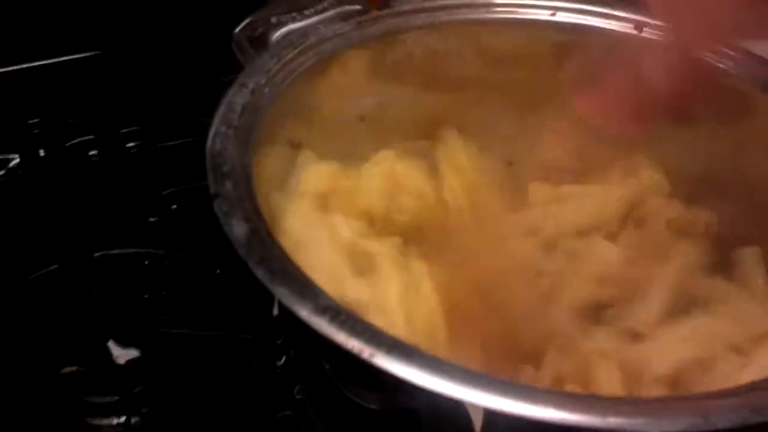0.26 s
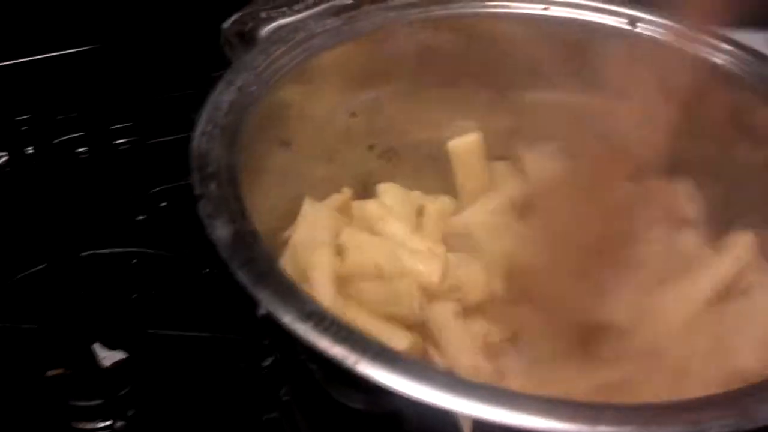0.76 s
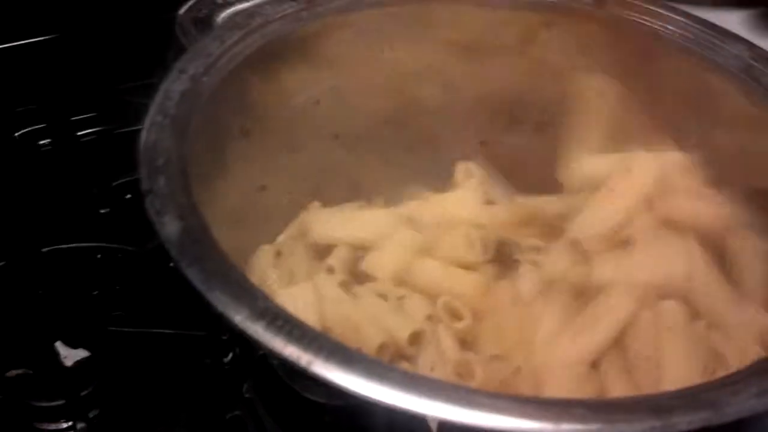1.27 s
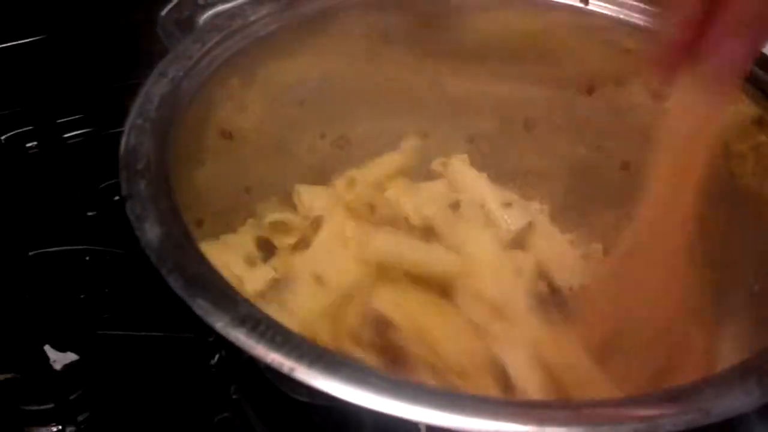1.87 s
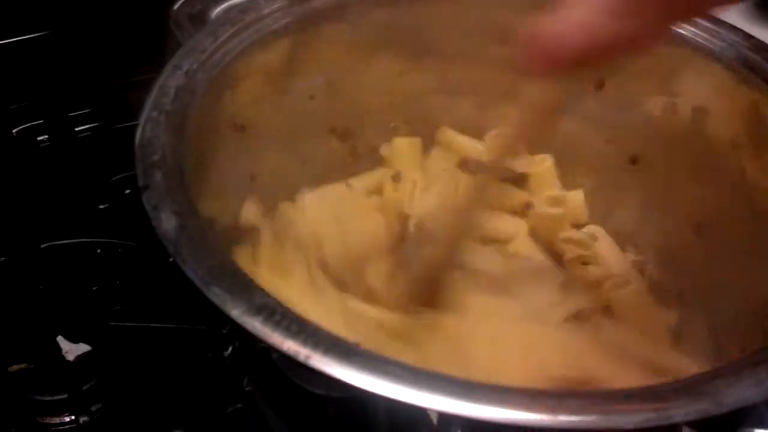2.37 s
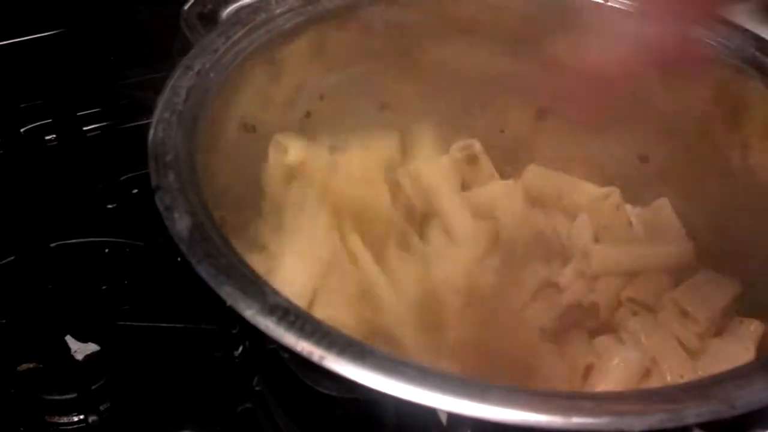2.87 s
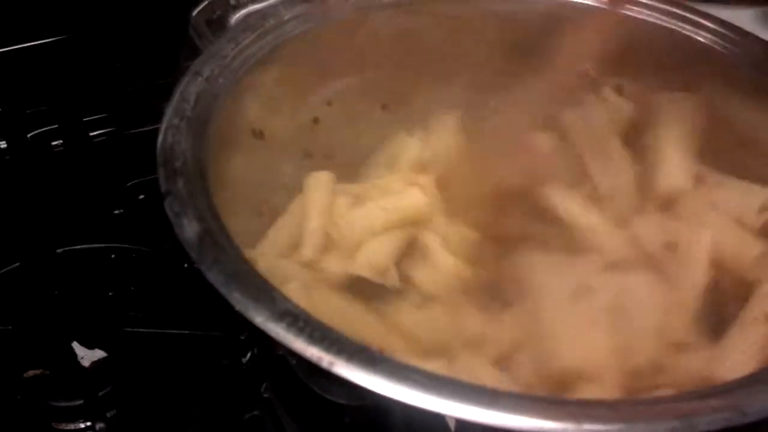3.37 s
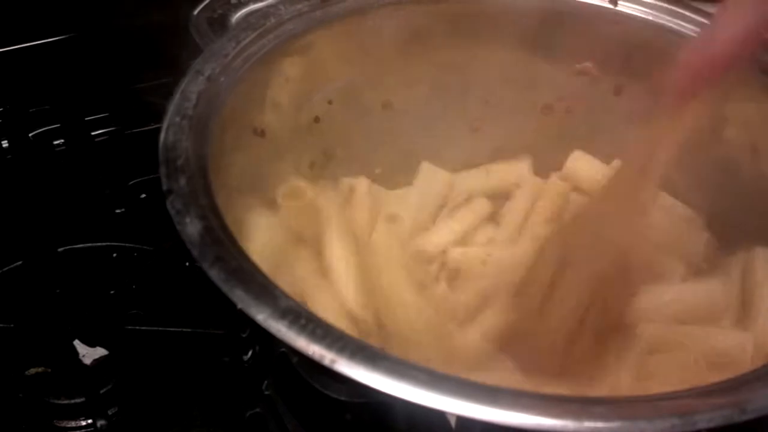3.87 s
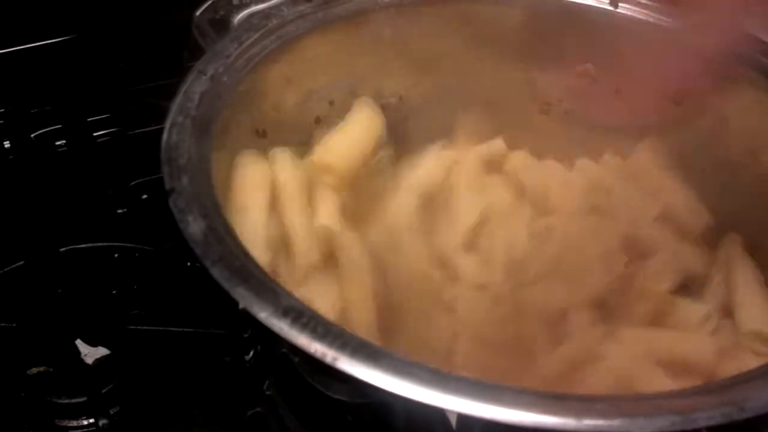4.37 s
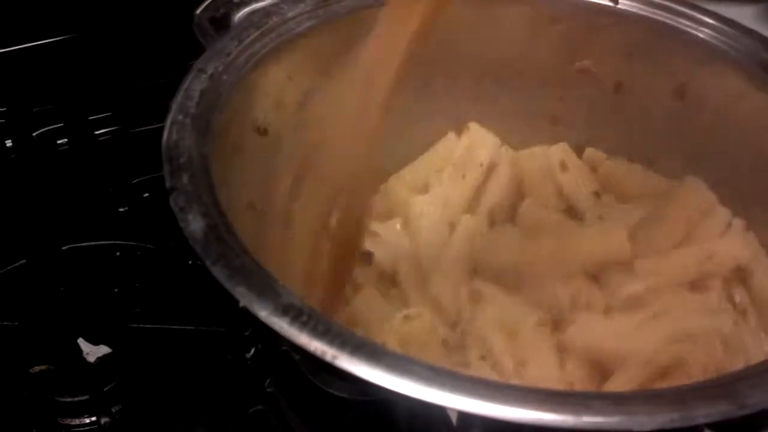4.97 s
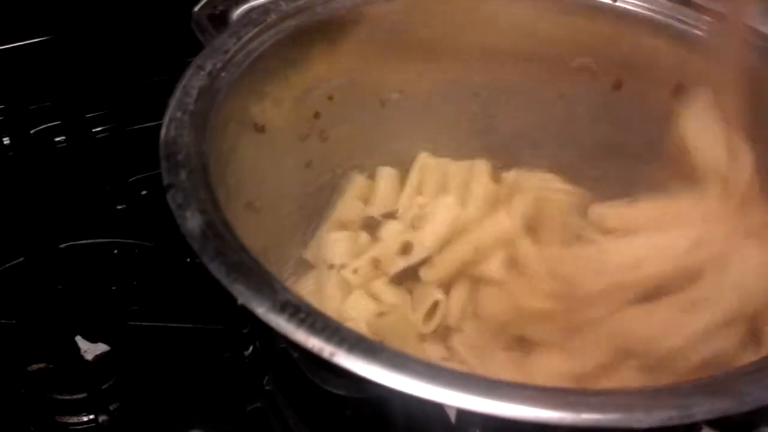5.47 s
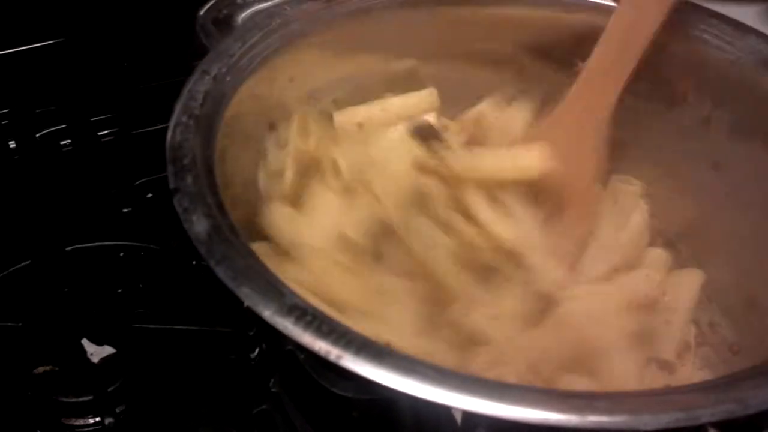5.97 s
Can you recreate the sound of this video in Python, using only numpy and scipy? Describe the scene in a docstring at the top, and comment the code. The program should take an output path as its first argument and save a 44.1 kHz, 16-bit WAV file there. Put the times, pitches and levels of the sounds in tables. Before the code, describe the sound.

Close up in a quiet kitchen, a wooden spoon stirs egg-coated pasta in a steel pot. A vigorous wet burst of squelching, popping and base knocks eases into softer sliding, with a hard ringing clack on the wall. Stirring grows again with sticky crackles, flopping lumps and short groans from the pot, calms around another clack, then continues gently. Wide stereo, with short hollow pot echoes.

```python
"""Stirring pasta in a steel pot

A wooden spoon stirs pasta quickly through raw egg in a steel pot on a kitchen hob. Shaped noise and
grains slosh and fizz, swelling sines squelch and pop, and wet noise bursts flop down; the spoon rings
the base's damped modes and twice clacks the wall, and the base groans. Two close microphones are
cross-fed into wide stereo."""
import sys
import numpy as np
from scipy import signal
from scipy.fft import rfft, irfft, next_fast_len
from scipy.io import wavfile
from scipy.ndimage import uniform_filter1d

SR = 44100
rng = np.random.default_rng(int(sys.argv[2]) if len(sys.argv) > 2 else 0)


def store_wav(level_fs):
    """Save 16-bit WAV to argv[1]."""
    pcm = np.round(np.clip(np.atleast_2d(level_fs), -1, 1) * 32767)
    wavfile.write(sys.argv[1], SR, pcm.T.astype(np.int16))


N = 274302
T = np.arange(N) / SR


def amp(db):
    """Decibels to gain."""
    return 10 ** (np.asarray(db) / 20)


def evened(x):
    """Scales to an rms of 1."""
    return x / np.sqrt(np.mean(x ** 2) + 1e-20)


def peaked(x, size=88):
    """Scales so that the loudest two milliseconds have an rms of 1."""
    return x / np.sqrt(uniform_filter1d(x ** 2, size).max() + 1e-20)


def read(points, hz):
    """Reads a table on a log-frequency axis."""
    f, value = np.transpose(points)
    return np.interp(np.log(hz + 1), np.log(f + 1), value)


def add(mix, s, sound):
    """Adds a sound to the mix at a time."""
    part = mix[max(round(s * SR), 0):][:len(sound)]
    part += sound[:len(part)]


def through(x, response):
    """Convolution, cut to the input's length."""
    return signal.oaconvolve(x, response)[:len(x)]


def colour(points, size=4096):
    """Causal (minimum-phase) impulse response with a given spectrum."""
    log_gain = np.log(amp(read(points, abs(np.fft.fftfreq(size, 1 / SR)))))
    return np.fft.ifft(np.exp(np.conj(signal.hilbert(log_gain)))).real[:size // 2]


def high_pass(x, hz):
    """Second-order low cut."""
    return signal.sosfilt(signal.butter(2, hz, "high", fs=SR, output="sos"), x)


def band(x, hz, spread):
    """Broad resonance between hz / spread and hz * spread."""
    edges = [hz / spread, hz * spread]
    return signal.sosfilt(signal.butter(2, edges, "band", fs=SR, output="sos"), x)


def swell(t, rise_s):
    """Rises to 1 in the rise time and dies away."""
    u = t / rise_s
    return u * np.exp(1 - u)


def fall(t, t60_s):
    """Exponential decay by 60 dB in t60."""
    return np.exp(-np.log(1000) * t / t60_s)


def ring(modes, detune=1, length=1):
    """Dying sines of a struck object."""
    t = T[:SR // 2]
    return sum(amp(db) * fall(t, t60 * length) * np.sin(2 * np.pi * hz * detune * t)
               for hz, db, t60 in modes)


def bubble(t, hz, rise_s, glide=0.017):
    """A pocket of air rings while it opens, rising in pitch; silent before t = 0."""
    t = np.maximum(t, 0)
    bend = 1 + glide * np.clip(t / rise_s - 1, -1, 5)
    return swell(t, rise_s) * np.sin(2 * np.pi * hz * np.cumsum(bend) / SR)


def grains(per_s, spread_db, low_hz, high_hz, cycles, count=16):
    """Many tiny bursting films, each a short rising chirp; a few are much larger than the rest."""
    out = np.zeros(N)
    for hz in np.geomspace(low_hz, high_hz, count):
        place, size, chance = rng.random((1000, 3)).T
        hit = chance < per_s * N / SR / count / len(chance)
        size = np.minimum(-np.log(1 - size), 4.5)
        clicks = np.bincount((place * N).astype(int), hit * amp(spread_db * size), N)
        u = T[:int(SR * 4 * cycles / hz) + 8] * hz  # time in cycles
        chirp = swell(u, cycles / 2) * np.sin(2 * np.pi * u * (1 + 0.014 * u / cycles))
        out += np.sqrt(hz) * evened(through(clicks, chirp))
    return evened(out)


def clumps(per_s, depth_db):
    """A gain that lurches at random as lumps stick and let go."""
    steps = rng.standard_normal(2000)
    return amp(depth_db * np.interp(T * per_s, np.arange(len(steps)), steps))


# air inside the pot: freq_hz, level_db, t60_s
AIR_MODES = [(442, 0, 0.07), (790, -26, 0.18), (941, 3.5, 0.051), (1240, 3, 0.034), (1350, -20, 0.0089),
             (1596, 7, 0.031)]


def hollow(x, ring_db=-5):
    """The pot's air column rings along with whatever sounds inside it."""
    # each mode's level becomes its gain at resonance
    modes = [(hz, db + 20 * np.log10(2 * np.log(1000) / (t60 * SR)), t60) for hz, db, t60 in AIR_MODES]
    in_phase = -signal.hilbert(ring(modes)).imag  # sines to cosines
    return x + amp(ring_db) * through(x, in_phase)


# stirring effort, three bouts with gentle turning between: time_s, effort_db
EFFORT_CURVE = [(0.0, -3), (0.52, 1), (0.76, -15.5), (1.12, -19), (1.5, -15), (1.7, -20.5), (1.83, -12.5),
                (2.0, -10), (2.25, -14.5), (2.68, -2.5), (2.87, -7.5), (3.03, -7), (3.1, -18.5), (3.6, -8),
                (3.95, -7.5), (4.56, -2.5), (4.75, -7), (5.06, -19.5), (5.88, -18.5), (6.22, -11)]


def effort(s):
    """The stirring effort in dB at the given times."""
    return np.interp(s, *np.transpose(EFFORT_CURVE))


def chance_events(per_s, scatter_db, count=200):
    """Small events strewn in time, louder with the effort: rows of (s, level dB, a free draw 0-1)."""
    wait, free, size = rng.random((count, 3)).T
    s = np.cumsum(-np.log(1 - wait)) / per_s
    db = effort(s) + scatter_db * (2 * size - 1)
    return np.transpose([s, db, free])[s < N / SR]


def hum(hz=120, level_db=-69.5):
    """Mains hum of a kitchen appliance: one steady sine."""
    return amp(level_db) * np.sin(2 * np.pi * hz * T)


# kitchen noise spectrum: freq_hz, level_db
KITCHEN_COLOUR = [(20, -2), (60, -26), (85, -15), (125, -4), (200, 0.5), (450, -5), (1000, -37),
                  (2500, -36), (6000, -62), (16000, -28)]


def kitchen(level_db=-62.5):
    """Steady background of the kitchen: coloured noise."""
    return amp(level_db) * evened(through(rng.standard_normal(N), colour(KITCHEN_COLOUR)))


# base slips on the hob: start_s, length_s, level_db, start_pitch_hz, end_pitch_hz
BASE_SLIPS = [(2.21, 0.1, -38.5, 343, 310), (2.288, 0.11, -42, 313, 380), (2.36, 0.15, -48.5, 378, 418),
              (2.387, 0.14, -43.5, 323.8, 331), (2.578, 0.15, -39, 307, 330),
              (2.714, 0.094, -37, 336.5, 241), (2.93, 0.092, -47, 257, 216), (2.967, 0.058, -40, 340, 335),
              (3.225, 0.069, -45, 340, 321), (3.642, 0.066, -41, 337, 308), (4.32, 0.079, -38, 263, 315),
              (4.855, 0.075, -45, 320, 293)]


def drag(level_db=-3, flutter=0.29, wobble=0.019, rumble_db=-15, rumble_hz=115):
    """The pot groans over a low rumble as it shifts on the hob; each slip swells, glides and dies."""
    out = np.zeros(N)
    pressure, speed, rumble = rng.standard_normal((3, N))
    pressure, speed = evened(band(pressure, 25, 2)), evened(band(speed, 18, 2))
    rumble = amp(rumble_db) * evened(band(rumble, rumble_hz, 1.13))
    for s, length_s, db, start_hz, end_hz in BASE_SLIPS:
        t = T[:int(length_s * SR)]
        now = int(s * SR) + np.arange(len(t))
        hz = (start_hz + (end_hz - start_hz) * t / length_s) * (1 + wobble * speed[now])
        groan = (1 + flutter * pressure[now]) * np.sin(2 * np.pi * np.cumsum(hz) / SR)
        add(out, s, amp(db + level_db) * np.sin(np.pi * t / length_s) * (groan + rumble[now]))
    return out


# pasta drops back and jolts the pot: start_s, slap_level_db, rocking_level_db
FLOP_EVENTS = [(0.214, -39, -34), (0.537, -49, -36), (1.34, -52, -48.5), (1.5, -59, -68),
               (2.096, -41, -41.5), (2.744, -34, -34), (3.156, -64, -50), (3.447, -41.5, -40),
               (3.731, -38.5, -36), (4.028, -38.5, -34), (4.305, -31, -29), (4.587, -29.5, -30),
               (4.727, -38, -62), (5.495, -50.5, -45.5), (5.589, -49.5, -62)]
# whole pot rocking and ringing on the hob: freq_hz, level_db, t60_s
ROCK_MODES = [(170.3, 0, 0.17), (274, -8.5, 0.19), (321.5, -10.5, 0.17), (393, -10.5, 0.22),
              (909, -1, 0.12), (962, 2, 0.14), (1034, -14.5, 0.43), (1200, -17, 0.24), (1407, -7, 0.16)]
# wet body, shared with the sloshing: freq_hz, level_db
SLOSH_COLOUR = [(30, 0), (60, -7), (90, 3), (160, 8.5), (330, 9.5), (480, 1.5), (620, -3.5), (880, 1),
                (1500, -3.5), (2100, -15.5), (3000, -30), (5000, -29)]


def flops(slap_db=0.5, slap_rise_s=0.00054, slap_s=0.028, rock_rise_s=0.0099, spray_db=-11, spray_s=0.0047):
    """Lifted pasta lands in wet spray and a patter of soft blows; the pot rocks and rings under it."""
    out, t = np.zeros(N), T[:SR // 2]
    body = colour(SLOSH_COLOUR)
    for s, db, rock_db in FLOP_EVENTS:
        blows, spray = rng.standard_normal((2, len(t)))
        patter = blows * (1 - np.exp(-t / slap_rise_s)) * np.exp(-t / slap_s)
        slap = peaked(hollow(through(patter, body), ring_db=4.5))
        spray = peaked(band(spray * np.exp(-t / spray_s), 3300, 1.4))
        rock = ring(ROCK_MODES, rng.uniform(0.99, 1.007)) * (1 - np.exp(-(t / rock_rise_s) ** 2))
        add(out, s, amp(db + slap_db) * slap)
        add(out, s, amp(db + spray_db) * spray)
        add(out, s, amp(rock_db) * peaked(rock))
    return out


# spoon on the base: start_s, level_db, then relative to it upper_ring_db, splash_db, thump_db;
# ring_length_factor
KNOCK_EVENTS = [(0.1265, -16, -29, -21, -17, 0.62), (0.1335, -15.5, -23, -14, -22, 0.82),
                (0.4594, -11.5, 3, -13, -14, 0.96), (2.644, -13, -4, -13.5, -9.5, 0.7),
                (3.940, -16, -32, -21, -25, 0.55), (3.945, -22.5, -23, -11.5, -17, 1.1),
                (4.529, -19.5, -19, -14, -11, 0.85), (5.3196, -32, -14, -19, -13, 0.41)]
# loaded base, lower and upper ring: freq_hz, level_db, t60_s
BASE_MODES = [(446, 20, 0.032), (463, -2, 0.12), (755.5, 8, 0.12)]
BASE_UPPER_MODES = [(970, 7, 0.025), (1280, 9.5, 0.0058), (1560, 5.5, 0.049)]


def knocks(upper_db=-2.5, contact_s=0.00083, splash_s=0.014, hob_db=-10, thump_hz=175, thump_rise_s=0.011):
    """Spoon hits the base through pasta: a soft blow, a damped ring and a splash; the hob thumps below."""
    out, hob, t = np.zeros(N), np.zeros(N), T[:SR // 2]
    soft = 1 - np.exp(-t / contact_s)
    for s, db, bright_db, splash_db, thump_db, length in KNOCK_EVENTS:
        detune = rng.uniform(0.98, 1.015)
        spatter, shudder = rng.standard_normal((2, len(t)))
        upper = amp(bright_db + upper_db) * peaked(ring(BASE_UPPER_MODES, detune, length))
        body = peaked(ring(BASE_MODES, detune, length)) + upper
        splash = amp(splash_db) * peaked(band(spatter * np.exp(-t / splash_s), 1016, 1.45))
        thump = peaked(band(shudder * swell(t, thump_rise_s), thump_hz, 1.55))
        add(out, s, -amp(db) * soft * (body + splash))
        add(hob, s, amp(db + thump_db + hob_db) * thump)
    return high_pass(out, 260) + hob  # a small plate radiates little bass


# spoon on the bare wall: start_s, level_db
CLACK_EVENTS = [(0.903, -11.5), (4.9434, -13)]


def rubs(length_s=0.22, level_db=-50, pitch_hz=352, slips_per_s=260):
    """The spoon's edge sticks and slips along the wall on its way to each clack."""
    out, t = np.zeros(N), T[:int(length_s * SR)]
    pressure = np.sqrt(np.sin(np.pi * t / length_s))
    for s, _ in CLACK_EVENTS:
        slips = rng.standard_normal(len(t)) * (rng.random(len(t)) < slips_per_s / SR)
        add(out, s - length_s, amp(level_db) * pressure * evened(band(slips, pitch_hz, 1.6)))
    return out


# steel wall, also woken by snaps: freq_hz, level_db, t60_s
WALL_MODES = [(471, 2, 0.49), (656, 2.5, 0.29), (822, -8, 0.22), (881, 7, 0.2), (1448, -10, 0.49),
              (1600, 1.5, 0.25), (1780, -10, 0.3), (2130, -15, 0.44), (2297, 5, 0.27), (2296, 0, 0.46),
              (2403, 4, 0.35), (3470, -5, 0.4), (3450, 3, 0.45), (3780, -17, 0.12), (3980, -32, 0.24),
              (4200, -11, 0.57), (4130, -6, 0.34), (4097, -27, 0.2), (4300, -17, 0.32), (4660, -7, 0.24),
              (4750, -1, 0.3), (6300, 1, 0.13), (6620, 13, 0.061)]
# crack of wood on steel: freq_hz, level_db
CRACK_COLOUR = [(60, -19), (200, -7.5), (340, 5.5), (800, 3), (1250, -0.5), (2400, 6), (4200, 8.5),
                (6500, -1), (8500, -8.5), (10500, -0.5), (16000, -15)]


def clacks(level_db=1.0, rattle=0.12, rattle_s=0.0054, bounce=0.3, bounce_s=0.0035,
           wall_db=-22, shimmer_db=-25.0, shimmer_t60_s=0.28):
    """Wood on bare steel: a hard crack, one quick bounce, a rattle of short modes, then long ones."""
    out, t = np.zeros(N), T[:SR // 3]
    for s, db in CLACK_EVENTS:
        short, long = rng.standard_normal((2, len(t)))
        blow = rattle * band(short, 540, 2.34) * np.exp(-t / rattle_s)
        blow[0] += 1
        add(blow, bounce_s, np.array([bounce]))
        # modes too close to tell apart
        crowd = 0.85 * evened(band(long, 2200, 1.086)) + 0.15 * evened(band(long, 3670, 1.25))
        crowd += evened(band(long, 3000, 1.9))
        add(out, s, amp(db + level_db) * peaked(through(blow, colour(CRACK_COLOUR))))
        add(out, s, amp(db + wall_db) * peaked(ring(WALL_MODES)))
        add(out, s, amp(db + shimmer_db) * peaked(crowd * fall(t, shimmer_t60_s)))
    return out


# thick threads of egg snapping: start_s, pop_level_db, pop_pitch_hz, tick_level_db
THICK_THREADS = [(0.037, -34, 3650, -42), (0.058, -29.5, 3850, -39), (0.0935, -24.5, 3330, -43),
                 (0.1146, -29.5, 4600, -41), (0.1268, -26, 3740, -39), (0.21, -40, 3720, -58),
                 (0.373, -30, 3600, -58), (0.4227, -35, 3520, -40), (0.434, -28.5, 3520, -48),
                 (0.577, -42, 4170, -63), (0.653, -42, 3970, -48), (0.7068, -45, 3500, -48),
                 (0.769, -62, 4000, -55), (1.222, -38.5, 3770, -56), (1.274, -43, 4300, -52),
                 (1.637, -57, 3900, -53.5), (1.77, -42.5, 3670, -55), (1.857, -41, 3830, -61),
                 (1.903, -35.5, 3960, -61), (2.035, -38, 3440, -69), (2.162, -42, 3890, -66),
                 (2.182, -35, 3400, -62), (2.191, -47, 3500, -49), (2.2105, -35.5, 4600, -43),
                 (2.362, -62, 4000, -47), (2.451, -39, 3840, -50), (2.504, -39, 3770, -65),
                 (2.5258, -24.5, 4860, -56), (2.528, -28, 3200, -44), (2.535, -31, 4200, -51),
                 (2.542, -36, 4330, -56), (2.72, -23, 4400, -45), (2.76, -48, 4000, -47),
                 (2.833, -33.5, 4800, -49), (2.958, -23.5, 3460, -46), (3.012, -32, 3680, -50),
                 (3.017, -22, 3500, -34.5), (3.022, -24.5, 3820, -32), (3.189, -44, 4500, -68),
                 (3.3343, -43, 3600, -43), (3.385, -37.5, 3930, -50), (3.587, -29, 3680, -41.5),
                 (3.642, -32, 3300, -57), (3.671, -42, 3800, -50), (3.730, -32, 3380, -52),
                 (3.843, -36, 3730, -64), (3.891, -35.5, 4570, -61), (3.930, -33, 3860, -50),
                 (3.98, -46, 3900, -43.5), (4.118, -36, 4450, -58), (4.182, -35, 3710, -56),
                 (4.246, -33, 3970, -38.5), (4.274, -34.5, 3400, -38), (4.365, -34, 4460, -37),
                 (4.469, -36, 3870, -52), (4.486, -39, 3520, -42), (4.496, -34, 4530, -53),
                 (4.5188, -33, 3780, -40), (4.529, -26.5, 3680, -41), (4.582, -35.5, 3800, -47),
                 (4.634, -52, 4000, -50), (4.728, -35.5, 4080, -47), (4.782, -43, 4300, -47),
                 (4.885, -69, 3970, -55), (5.3257, -35.5, 3140, -48.5), (5.346, -46, 4100, -60),
                 (5.452, -46, 3830, -71), (5.62, -46.5, 4770, -53.5), (5.9876, -45, 3930, -42),
                 (6.191, -41, 3900, -55)]
# thin threads snap at random; levels at 0 dB effort
THREADS_PER_S, THREAD_POP_DB, THREAD_TICK_DB, THREAD_SCATTER_DB = 7, -34.5, -51, 5.5
THREAD_LOW_HZ, THREAD_HIGH_HZ = 3230, 4970


def snaps(rise_s=0.00037, spread=1.32, pop_db=-2, tick_db=7.5, tick_rise_s=0.0001, wall_db=-25):
    """Sticky threads break: a tiny bubble pops, with a bright tick that faintly wakes the steel."""
    out, t = np.zeros(N), T[:SR // 50]
    wall = peaked(ring(WALL_MODES))
    thin = [(s, THREAD_POP_DB + db, THREAD_LOW_HZ + free * (THREAD_HIGH_HZ - THREAD_LOW_HZ),
             THREAD_TICK_DB + db)
            for s, db, free in chance_events(THREADS_PER_S, THREAD_SCATTER_DB)]
    for s, db, hz, crisp_db in THICK_THREADS + thin:
        splutter, tick = rng.standard_normal((2, len(t)))
        pop = np.sin(2 * np.pi * hz * t) + 0.72 * evened(band(splutter, hz, spread))
        add(out, s, amp(db + pop_db) * peaked(pop * swell(t, rise_s)))
        add(out, s, amp(crisp_db + tick_db) * peaked(band(tick * swell(t, tick_rise_s), 10200, 1.41)))
        add(out, s, amp(db + wall_db) * wall)
    return out


# large air pockets squeezed out of the pasta: start_s, level_db, pitch_hz, swell_s
LARGE_POCKETS = [(0.067, -26, 860, 0.0046), (0.187, -18, 1080, 0.0012), (0.209, -21.5, 990, 0.0009),
                 (0.317, -24.5, 950, 0.0018), (0.374, -29.5, 1320, 0.0037), (0.539, -22.5, 880, 0.0028),
                 (0.581, -25.5, 1039, 0.0037), (0.61, -24, 1060, 0.00087), (0.643, -25, 845, 0.0032),
                 (1.057, -38.5, 1560, 0.0046), (1.128, -38, 1650, 0.00078), (1.342, -43, 1000, 0.0068),
                 (1.392, -44, 987, 0.0045), (1.43, -37, 1830, 0.00064), (1.501, -39, 984, 0.0078),
                 (1.581, -46.5, 1286, 0.0091), (1.901, -25.5, 918, 0.0058), (1.974, -36, 1550, 0.00084),
                 (2.001, -27.5, 930, 0.0017), (2.033, -33.5, 1410, 0.0024), (2.055, -25, 916, 0.0046),
                 (2.337, -32.5, 1020, 0.0022), (2.393, -31.5, 1230, 0.0017), (2.42, -35, 1052, 0.0048),
                 (2.468, -32.5, 1370, 0.002), (2.534, -28.5, 1580, 0.0025), (2.564, -28.5, 1360, 0.0011),
                 (2.658, -25.5, 1394, 0.007), (2.7, -14, 935, 0.0022), (2.707, -13.5, 1468, 0.0023),
                 (2.716, -16.5, 1104, 0.0026), (2.837, -29.5, 936, 0.0026), (2.912, -27.5, 855, 0.0019),
                 (2.98, -29.5, 1320, 0.002), (3.012, -26, 1176, 0.0015), (3.151, -39.5, 930, 0.0016),
                 (3.288, -34, 1010, 0.0011), (3.327, -37.5, 1016, 0.0034), (3.361, -36.5, 1100, 0.0048),
                 (3.535, -37, 1386, 0.0045), (3.582, -29, 995, 0.0038), (3.594, -25, 920, 0.0016),
                 (3.596, -26.5, 1720, 0.0015), (3.703, -30.5, 1150, 0.0013), (3.884, -35.5, 876, 0.003),
                 (4.123, -35, 1525, 0.002), (4.171, -26, 900, 0.0014), (4.218, -35, 1100, 0.0038),
                 (4.248, -17.5, 1140, 0.00065), (4.292, -23.5, 1350, 0.0016), (4.311, -25, 968, 0.0043),
                 (4.451, -26, 890, 0.0033), (4.524, -18, 1110, 0.0019), (4.59, -23.5, 940, 0.0018),
                 (4.699, -31.5, 940, 0.0032), (4.723, -29.5, 860, 0.0021), (4.738, -30.5, 1300, 0.0026),
                 (4.742, -26, 939, 0.0042), (5.11, -43, 1170, 0.0021), (5.227, -46, 1350, 0.0023),
                 (5.284, -44, 940, 0.0056), (5.3255, -31.5, 1150, 0.00065), (5.419, -41, 1120, 0.0025),
                 (5.433, -42.5, 834, 0.0057), (5.496, -39, 950, 0.0034), (5.575, -36, 893, 0.007),
                 (5.596, -32.5, 895, 0.0072), (5.602, -28.5, 1030, 0.0043), (5.781, -43, 983, 0.0042),
                 (6.072, -33, 934, 0.0045)]
# small pockets come at random; level at 0 dB effort
POCKETS_PER_S, POCKET_DB, POCKET_SCATTER_DB, POCKET_SWELL_S = 9, -33.5, 1, 0.0034
POCKET_LOW_HZ, POCKET_HIGH_HZ = 855, 1746


def squelches(froth=0.67, spread=1.45, clean_s=0.012, splutter=0.69, spray_db=-20, level_db=-6, count=5):
    """An air pocket opens among smaller ones; slow ones ring round and clean, quick ones splutter."""
    out, t = np.zeros(N), T[:SR // 10]
    small = [(s, POCKET_DB + db, POCKET_LOW_HZ * (POCKET_HIGH_HZ / POCKET_LOW_HZ) ** (free ** 2),
              POCKET_SWELL_S)
             for s, db, free in chance_events(POCKETS_PER_S, POCKET_SCATTER_DB)]
    for s, db, hz, rise_s in LARGE_POCKETS + small:
        egg, spray = rng.standard_normal((2, len(t)))
        haste = 1 / (1 + (rise_s / clean_s) ** 2)
        neighbours = sum(bubble(t - 2 * late * rise_s, hz * spread ** (2 * size - 0.7), 0.75 * rise_s)
                         for late, size in rng.random((count, 2)))
        burst = splutter * haste * evened(band(egg, hz, spread))
        burst += amp(spray_db) * evened(band(spray, 2000, 3.2))
        wet = bubble(t, hz, rise_s) + froth * neighbours / np.sqrt(count) + swell(t, rise_s) * burst
        add(out, s, amp(db + level_db) * peaked(wet))
    return hollow(out, ring_db=-21.0)


# sticky lumps peeling away: letting_go_s, level_db
PEEL_EVENTS = [(0.125, -44), (0.71, -55), (2.54, -53), (2.945, -52), (3.027, -40), (3.66, -49.5),
               (4.55, -48), (6.22, -62)]


def peeling(build_s=0.06, release_s=0.012):
    """Gain of the crackle that builds as each lump peels away and dies fast when it lets go."""
    return sum(amp(db) * np.exp(-np.maximum((s - T) / build_s, (T - s) / release_s))
               for s, db in PEEL_EVENTS)


# wet smack and fine fizz spectra: freq_hz, level_db
SMACK_COLOUR = [(900, -8.5), (1800, 13), (2400, 8.5), (3700, 8), (4700, 6.5), (5800, -8.5), (9000, -25)]
FIZZ_COLOUR = [(2500, -31), (5000, 1), (6500, 3.5), (8000, -1), (10000, 5), (13000, 2.5), (16000, 2.5)]
# level at 0 dB effort; follow in dB per dB of effort
SLOSH_DB, SLOSH_FOLLOWS = -38.5, 1.038
SMACK_DB, SMACK_FOLLOWS = -47, 0.89
FIZZ_DB, FIZZ_FOLLOWS, PEEL_FIZZ_DB = -46.5, 0.81, 2.5


def stirring():
    """Pasta slides over pasta: slosh, wet smacks and fizz from noise and grains, on two sides of the pot."""
    work_db, tearing = effort(T), peeling()
    slosh_gain = amp(SLOSH_DB + SLOSH_FOLLOWS * work_db)
    smack_gain = np.hypot(amp(SMACK_DB + SMACK_FOLLOWS * work_db), tearing)
    fizz_gain = np.hypot(amp(FIZZ_DB + FIZZ_FOLLOWS * work_db), amp(PEEL_FIZZ_DB) * tearing)
    peel = clumps(per_s=79, depth_db=2.5)  # shared by both sides
    sides = []
    for smear in rng.standard_normal((2, 3, N)):
        blobs = grains(per_s=380, spread_db=2.5, low_hz=378.2, high_hz=1800, cycles=5.45)
        pops = grains(per_s=300, spread_db=2.5, low_hz=2037, high_hz=5800, cycles=2.5)
        prickle = grains(per_s=1200, spread_db=3.0, low_hz=4320, high_hz=14800, cycles=2.8)
        slosh = evened(hollow(through(0.77 * smear[0] + 0.47 * blobs, colour(SLOSH_COLOUR))))
        smack = through(1.22 * smear[1] + 0.38 * pops, colour(SMACK_COLOUR))
        smack = evened(peel * clumps(per_s=45, depth_db=2.5) * smack)
        fizz = evened(peel * through(0.96 * smear[2] + 0.52 * prickle, colour(FIZZ_COLOUR)))
        sides.append(slosh_gain * slosh + smack_gain * smack + fizz_gain * fizz)
    return sides


def echoes(decay, start_s):
    """Dense reflections of energy 1, each band dying at its own speed."""
    hz, t, z = signal.stft(rng.standard_normal(SR // 2), SR, nperseg=128)
    tail = signal.istft(z * fall(t, read(decay, hz)[:, None]), SR, nperseg=128)[1]
    return np.r_[np.zeros(int(start_s * SR)), tail / np.linalg.norm(tail)]


def scatter(spread_s=.0015, count=80):
    """All-pass path to the second side: frequencies arrive equally loud, each at its own small delay."""
    delay_s = np.interp(np.arange(2049), np.linspace(0, 2048, count), rng.exponential(spread_s, count))
    return irfft(np.exp(-2j * np.pi * np.cumsum(delay_s) * SR / 4096))[:1024]


def roaming(x, path, turns_per_s=2.8, count=5):
    """The spoon circles the pot, so the sound cross-fades through one path after another."""
    place = T * turns_per_s * count
    away = (abs((place - k + count / 2) % count - count / 2) for k in range(count))
    return sum(through(x * np.cos(np.pi / 2 * np.minimum(d, 1)), path()) for d in away)


# echoes of pot and hob, kitchen decay: freq_hz, t60_s
CLOSE_DECAY = [(200, 0.069), (1000, 0.058), (4000, 0.095), (7000, 0.095), (12000, 0.0032)]
ROOM_DECAY = [(150, 0.56), (300, 0.4), (800, 0.26), (2500, 0.12), (6000, 0.067), (12000, 0.0046)]
# far microphone against the near one: freq_hz, likeness (clipped to 0-1)
LIKENESS = [(60, -2.5), (170, 0.6), (300, 0.58), (450, 0.28), (750, 1.3), (1300, 2), (2000, -2.5),
            (3000, -0.84), (16000, 0.12)]
# far microphone's shading: freq_hz, level_db
FAR_SHADE = [(200, -1.5), (310, 2.5), (430, -7.5), (600, -5), (1000, -8.5), (1600, -8.5), (2500, 0),
             (4000, -1.5), (16000, -6.5)]


def scene(close_db=-10, room_db=-16, groan_far_db=-6):
    """All sounds reach a near and a shaded microphone with echoes of pot, hob and kitchen."""
    hits, groan = squelches() + knocks() + snaps() + rubs() + clacks(), drag()
    hits_by_side = (hits, roaming(hits, scatter))
    groan_by_side = (groan, amp(groan_far_db) * groan)
    heard = []
    for mass, blows, base in zip(stirring(), hits_by_side, groan_by_side):
        in_pot = mass + flops() + blows
        wet = amp(close_db) * roaming(in_pot, lambda: echoes(CLOSE_DECAY, 0.001231)[:SR // 8])
        wet += amp(room_db) * through(in_pot + base, echoes(ROOM_DECAY, .007))
        heard.append(in_pot + base + wet + hum() + kitchen())
    size = next_fast_len(N + SR // 10)
    (near, other), hz = rfft(heard, size), np.fft.rfftfreq(size, 1 / SR)
    alike = np.clip(read(LIKENESS, hz), 0, 1)
    far = amp(read(FAR_SHADE, hz)) * (alike * near + np.sqrt(1 - alike ** 2) * other)
    return irfft(np.array([near, far]), size)[:, :N]


# share of each microphone subtracted from the other side: freq_hz, share (clipped to 0-1)
CROSSFEED_SHARE = [(400, 0.17), (800, 0.78), (1300, 1), (2500, 1), (16000, 1)]
# output tone: freq_hz, level_db
OUTPUT_TONE = [(300, -0.5), (450, 1), (800, 0.5), (1300, -4), (1650, -2), (2000, 0.5), (3000, -3.5),
               (16000, -3)]


def record(dry, low_cut_hz=100, delay_s=16 / SR, edge_hz=15900):
    """Stereo widening: each side loses a delayed copy of the other; then tone, low cut and band limit."""
    size = next_fast_len(N + SR // 10)
    ports, hz = rfft(dry, size), np.fft.rfftfreq(size, 1 / SR)
    feed = np.clip(read(CROSSFEED_SHARE, hz), 0, 1) * np.exp(-2j * np.pi * hz * delay_s)
    wide = (ports - feed * ports[::-1]) * amp(read(OUTPUT_TONE, hz))
    cut = high_pass(irfft(wide, size)[:, :N], low_cut_hz)
    edge = signal.firwin(401, edge_hz, window=("kaiser", 8), fs=SR)
    return signal.oaconvolve(cut, edge[None], "same")


dry = scene()
out = record(dry)
store_wav(out)
```